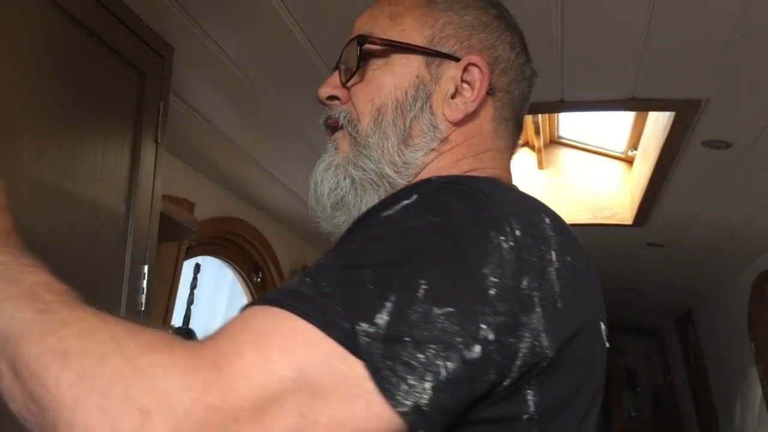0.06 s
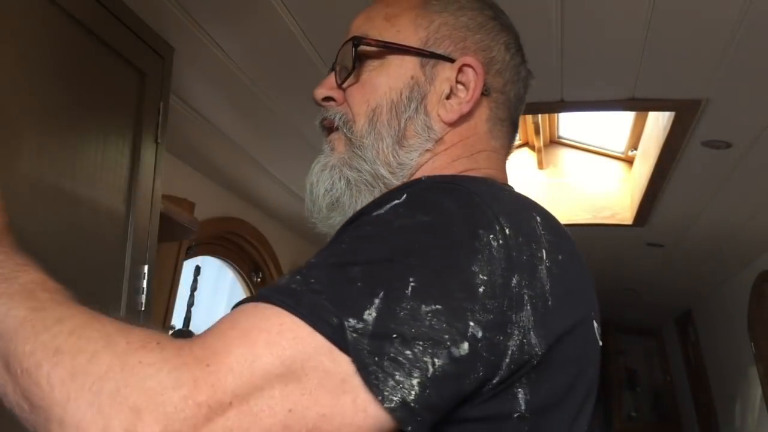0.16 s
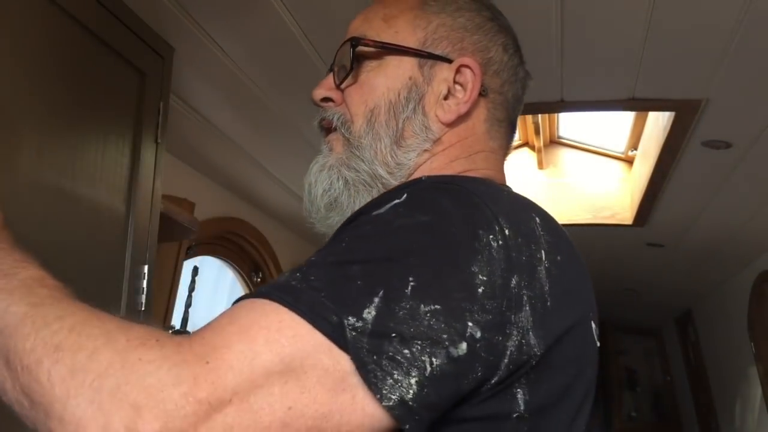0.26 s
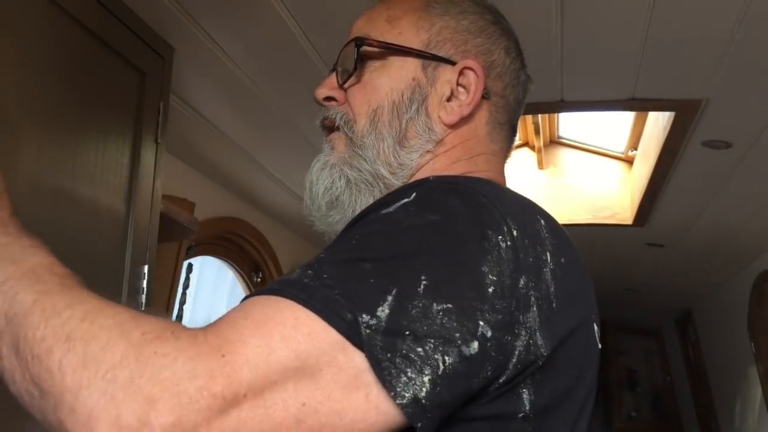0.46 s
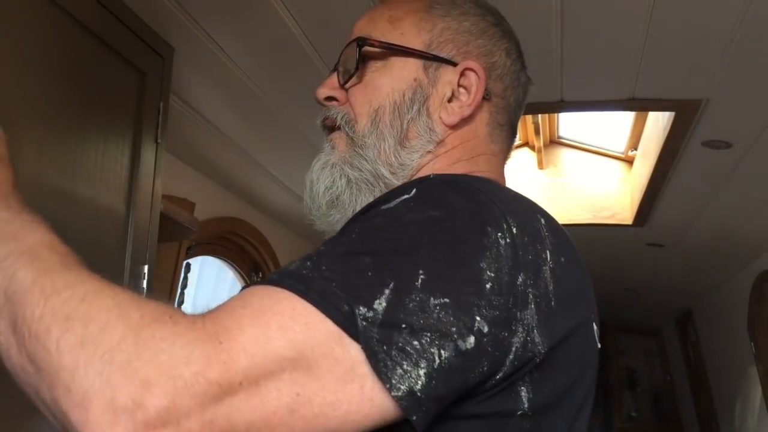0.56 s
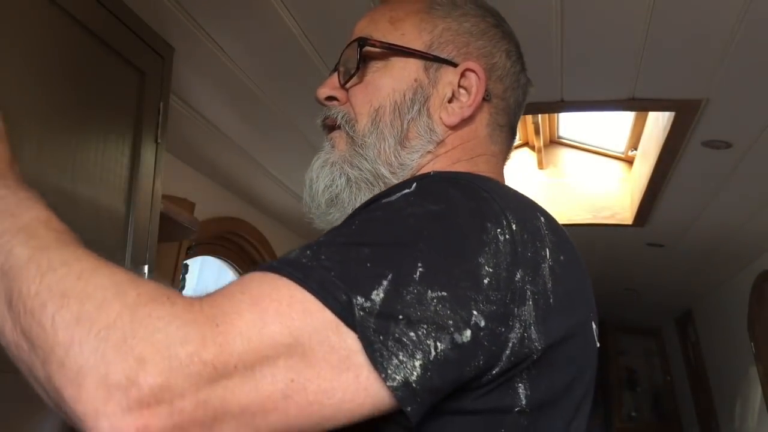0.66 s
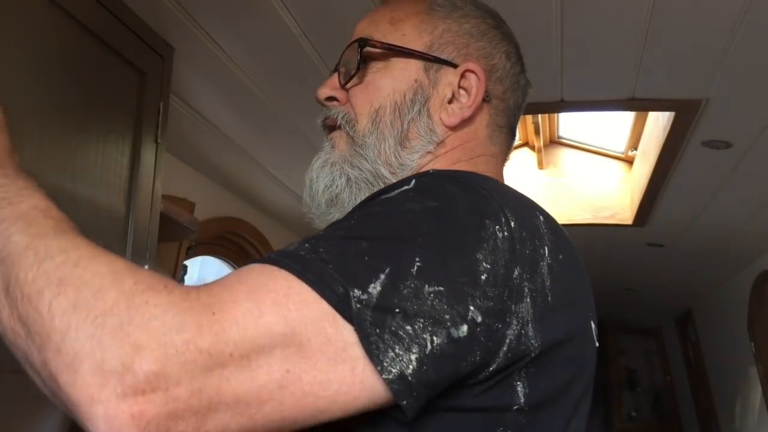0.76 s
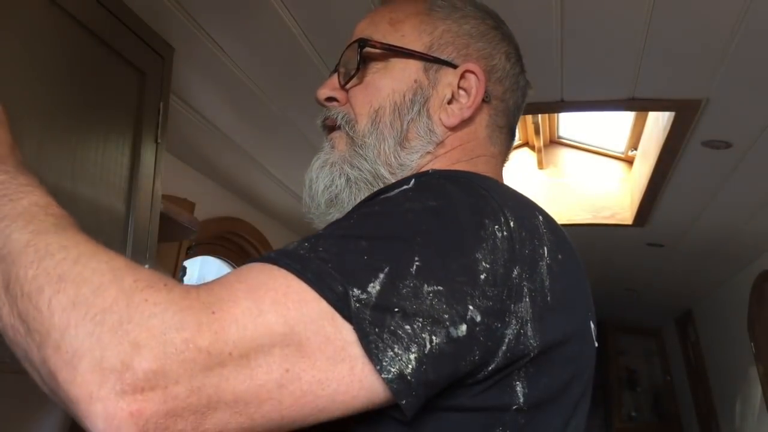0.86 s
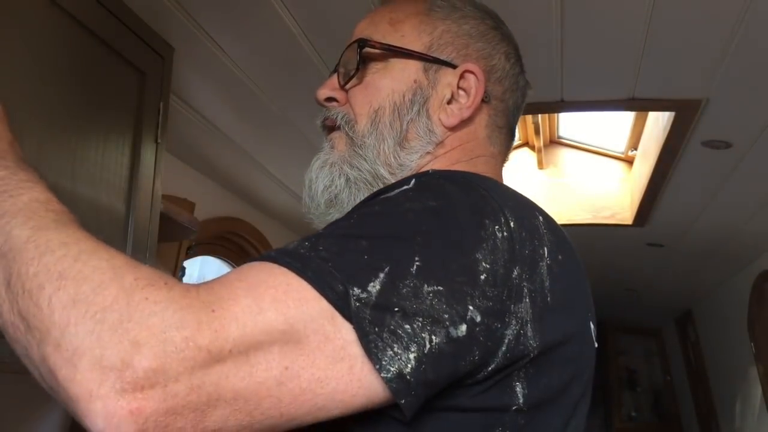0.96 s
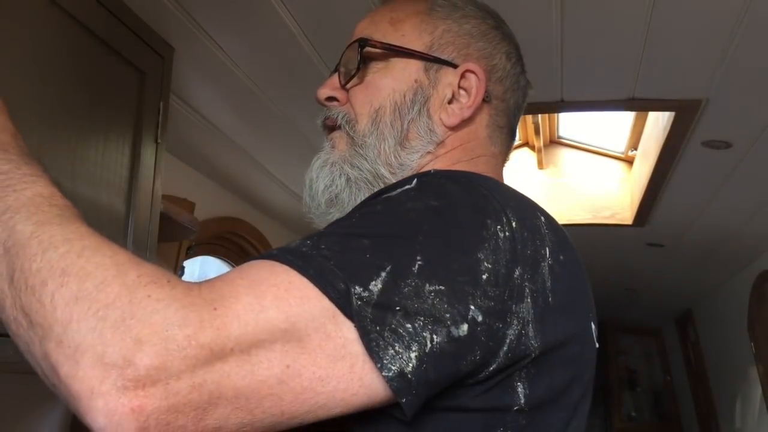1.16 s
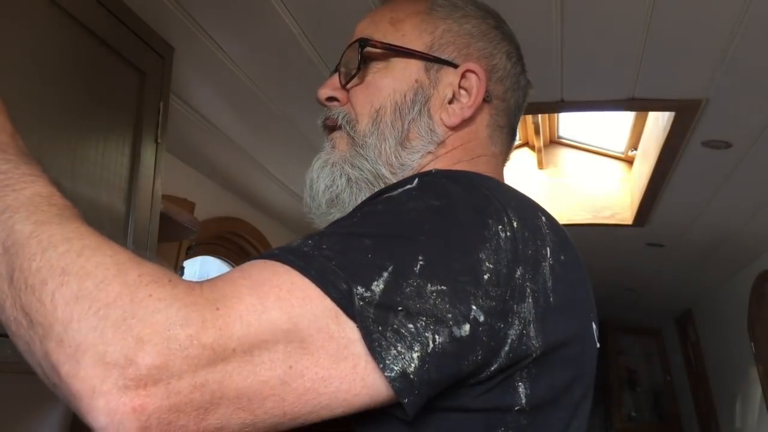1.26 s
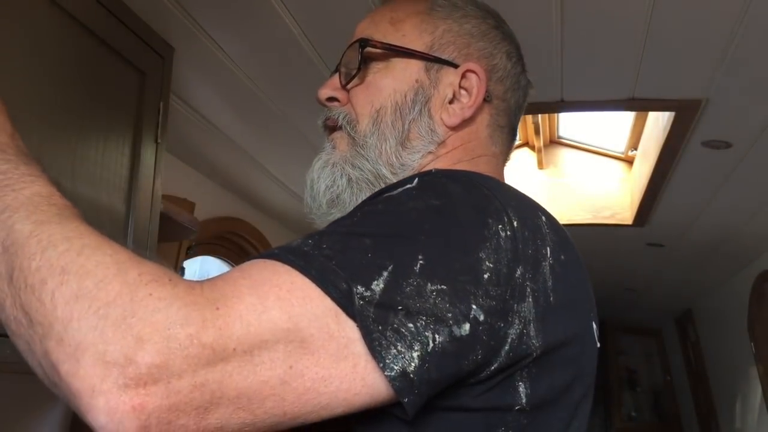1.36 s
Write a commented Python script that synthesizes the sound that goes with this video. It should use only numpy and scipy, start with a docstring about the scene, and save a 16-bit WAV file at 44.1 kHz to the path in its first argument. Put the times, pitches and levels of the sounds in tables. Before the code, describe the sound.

Close by in a small cabin, a wooden cupboard door shuts with a light clack of the catch and a loud, ringing bang. The wood shudders briefly, then a soft thud comes over a faint fan hum.

```python
"""Cupboard door shut in a small cabin

A pushed wooden door knocks on the sprung ball of its catch, which buzzes. It rides over the ball and
slams on the frame: the panel rings under a bright crack and a wood clatter, then shudders and creaks.
Later comes a soft thud on the woodwork. A small fan hums; the microphone softly saturates on the slam."""
import sys
import numpy as np
from scipy import signal
from scipy.fft import rfft, irfft, next_fast_len
from scipy.io import wavfile
from scipy.ndimage import map_coordinates

SR = 44100
rng = np.random.default_rng(int(sys.argv[2]) if len(sys.argv) > 2 else 0)


def wav_out(sig):
    """Save sig, one row per channel (or a flat mono array), as 16-bit PCM at SR to the path in sys.argv[1]."""
    wavfile.write(sys.argv[1], SR, np.round(np.clip(np.atleast_2d(sig).T, -1, 1) * 32767).astype(np.int16))


N = 61739
TIME_S = np.arange(N) / SR
BALL_S, SLAM_S, THUD_S = 0.2003, 0.3337, 1.104

# Modes of the door panel: pitch_hz, ball_level_db, slam_level_db, t60_s
DOOR_MODES = [(86.1, -27.5, -11, .17), (98, -33, -7, 0.037), (135.1, -10, -3.5, 0.15),
              (247, -19.5, -8.5, 0.11), (294.2, -26.5, -26, 0.32), (378.7, -50.5, -30.5, 0.38),
              (445.3, -46.5, -39.5, 0.53), (490.3, -53, -21.5, .15), (551.7, -54, -14.5, 0.2),
              (595.4, -31.5, -34, 0.17), (656.3, -38, -18.5, 0.15), (815, -34.5, -17, 0.11),
              (870, -51.5, -28, 0.27), (1024, -40, -24, 0.16), (1094, -38.5, -16.5, 0.078),
              (1208, -31.5, -21, 0.11), (1322, -41, -26.5, 0.17), (1423, -25, -21.5, 0.055),
              (2124, -63, -29.5, 0.092), (2736, -44.5, -25.5, 0.053)]


def amp(db):
    """Decibels to gain."""
    return 10 ** (np.asarray(db) / 20)


def along(points, hz):
    """A curve through (freq_hz, value) points on a log frequency axis."""
    freqs, values = np.transpose(points)
    return np.interp(np.log(hz + 1), np.log(freqs + 1), values)


def filtered(x, response):
    """A signal shaped by a frequency response."""
    size = next_fast_len(N + SR // 2)
    return irfft(rfft(x, size) * response(np.fft.rfftfreq(size, 1 / SR)), size)[:N]


def noise(response):
    """Coloured noise of rms 1."""
    x = filtered(rng.standard_normal(N), response)
    return x / np.sqrt(np.mean(x ** 2) + 1e-20)


def eq_noise(spectrum):
    """Noise of rms 1 coloured by (freq_hz, relative_db) points."""
    return noise(lambda hz: amp(along(spectrum, hz)))


def band(centre_hz, width_hz):
    """The response of one resonance, its width taken at half amplitude."""
    return lambda hz: 1 / (1 + (2 * (hz - centre_hz) / width_hz) ** 2)


def since(start_s):
    """Seconds after an event, zero before it."""
    return np.maximum(TIME_S - start_s, 0)


def attack(start_s, rise_s):
    """An envelope that eases up from 0 to 1."""
    return 1 - np.exp(-since(start_s) / rise_s)


def fade(start_s, t60_s):
    """A sudden start and an exponential decay."""
    age = since(start_s)
    return (age > 0) * amp(-60 * age / t60_s)


def ring(start_s, modes, rise_cycles=0.66):
    """Struck wood: damped modes, each building up over a fraction of its cycle."""
    return sum(amp(db) * fade(start_s, t60_s) * attack(start_s, rise_cycles / hz) ** 2
               * np.cos(2 * np.pi * hz * since(start_s)) for hz, db, t60_s in modes)


def clatter(start_s, spectrum, level_db):
    """Dense wood clatter spreading through the cabin: noise whose treble dies first."""
    # Decay across the spectrum: freq_hz, t60_s
    decay_times = [(60, 0.32), (250, 0.32), (1000, 0.29), (4000, .24), (9000, 0.2), (16000, .13)]
    hz, frame_s, bands = signal.stft(eq_noise(spectrum), SR, nperseg=256)
    decay = amp(-60 * np.maximum(frame_s - start_s, 0) / along(decay_times, hz)[:, None])
    tail = signal.istft(bands * decay, SR, nperseg=256)[1][:N]
    return amp(level_db) * attack(start_s, rise_s=0.001) * tail


def crack(start_s, spectrum, level_db):
    """The first contact: a short, bright burst of noise."""
    envelope = attack(start_s, rise_s=0.00074) * fade(start_s, t60_s=0.029)
    return amp(level_db) * envelope * eq_noise(spectrum)


def slam():
    """The panel swells as the ball is squeezed, then strikes the frame and rings."""
    # Colour of the heavy wood clatter: freq_hz, relative_db
    clatter_eq = [(40, -17.5), (90, -1), (300, -13.5), (600, -11), (1100, -16), (1700, -23.5), (2700, -28),
                  (4000, -35.5), (7000, -48), (12000, -59.5), (16000, -48)]
    # Colour of the contact with the frame: freq_hz, relative_db
    crack_eq = [(300, -26), (1500, 1), (2800, -0.5), (4000, -10), (6500, -20), (12000, -35.5), (16000, -33)]
    swell_hz, peak_db, swell_db_per_s, release_t60_s = 133, -22.5, 712, 0.021
    to_slam_s = np.maximum(SLAM_S - TIME_S, 0)
    swell_db = peak_db - swell_db_per_s * to_slam_s - 60 * since(SLAM_S) / release_t60_s
    swell = amp(swell_db) * np.cos(2 * np.pi * swell_hz * to_slam_s)
    panel = ring(SLAM_S, [(hz, db, t60_s) for hz, _, db, t60_s in DOOR_MODES])
    return (swell + panel + clatter(SLAM_S, clatter_eq, level_db=-18)
            + crack(SLAM_S, crack_eq, level_db=-19.5))


def ball_catch():
    """The door meets the ball: a damped knock of the panel and a buzz of the spring."""
    # Noise bands of the spring: centre_hz, width_hz, level_db, t60_s
    spring_bands = [(2930, 100, -49, .12), (3880, 640, -55, 0.34), (6270, 1500, -53, 0.24)]
    # Colour of the light wood clatter: freq_hz, relative_db
    clatter_eq = [(60, -44), (140, -14), (300, -11), (700, -22), (1400, -20.5), (1900, -22), (2300, -47),
                  (4000, -57), (7000, -53), (12000, -53), (16000, -74)]
    # Colour of the contact with the ball: freq_hz, relative_db
    crack_eq = [(300, -13), (1400, 4), (2200, -7), (2900, -8), (4500, -15.5), (6500, -16), (12000, -22),
                (16000, -27.5)]
    buzz = sum(amp(db) * fade(BALL_S, t60_s) * noise(band(hz, width_hz))
               for hz, width_hz, db, t60_s in spring_bands)
    panel = ring(BALL_S, [(hz, db, t60_s) for hz, db, _, t60_s in DOOR_MODES])
    damping = fade(BALL_S, t60_s=0.69)
    return (panel * damping + buzz + clatter(BALL_S, clatter_eq, level_db=-32.5)
            + crack(BALL_S, crack_eq, level_db=-31))


def shudder():
    """Cupboard and door settle after the slam with an uneven low rumble."""
    # Envelopes of the cupboard's boom and the door's rumble: time_s, boom_db, panel_db
    envelopes = [(0.48, -61, -45), (0.512, -66, -71), (0.554, -53, -59), (0.59, -52, -71),
                 (0.628, -76, -54.5), (0.672, -48.5, -49), (0.74, -58, -76), (0.802, -63, -84),
                 (0.868, -62.5, -55.5), (0.932, -83, -85), (0.956, -73, -83), (1.0, -93, -93)]
    # Colour of the shuddering panel: freq_hz, relative_db
    panel_eq = [(90, -24), (140, -1.5), (260, -12.5), (500, -36.5), (1500, -85), (16000, -120)]
    times_s, boom_db, panel_db = np.transpose(envelopes)
    boom = amp(np.interp(TIME_S, times_s, boom_db)) * noise(band(centre_hz=81.5, width_hz=26))
    panel = amp(np.interp(TIME_S, times_s, panel_db)) * eq_noise(panel_eq)
    return attack(SLAM_S, rise_s=0.039) * (boom + panel)


def creaks():
    """The settling wood creaks faintly: two ticks of high noise."""
    # Creaks: start_s, level_db
    ticks = [(0.787, -75), (.856, -69.5)]
    envelope = sum(amp(db) * attack(start_s, rise_s=0.0015) * fade(start_s, t60_s=0.055)
                   for start_s, db in ticks)
    return envelope * noise(lambda hz: hz > 4500)


def thud():
    """A soft blow sets the woodwork ringing, low and dull."""
    # Modes of the woodwork: pitch_hz, level_db, t60_s
    wood_modes = [(81, -47, 0.27), (121, -29.5, 0.25), (130.8, -23.5, 0.084), (175, -61, 0.18),
                  (259.4, -35, 0.097), (301.2, -39.5, 0.2), (470, -42, 0.086), (584, -46.5, 0.077),
                  (667, -45.5, 0.055), (884, -50, 0.21), (1140, -53, 0.035), (1420, -53.5, 0.058)]
    # Colour of the muffled clatter: freq_hz, relative_db
    clatter_eq = [(60, -6), (130, 10), (330, -7), (700, -11), (1500, -32), (3000, -63), (16000, -120)]
    return ring(THUD_S, wood_modes) + clatter(THUD_S, clatter_eq, level_db=-42.5)


def fan():
    """A small fan: a steady blade tone and a wavering hum over soft air noise."""
    # Narrow bands of the hum: centre_hz, width_hz, relative_db
    hum_bands = [(295, 46, -4), (586, 37, -6.5), (916.3, 144, -2), (1272, 25, -25.5), (1598, 18, -11.5),
                 (1855, 58, -13.5), (2342, 21, -22), (3000, 160, -36)]
    # Colour of the air noise: freq_hz, relative_db
    air_eq = [(25, -28.5), (60, -4), (150, 0.5), (350, -4), (700, -6.5), (1200, -0.5), (2000, -8.5),
              (3500, -17), (7000, -24), (10000, -29), (14000, -28)]
    blade_hz, blade_db, air_db = 287, -64.5, -67
    hum_db, waver_db, wavers_per_s = -60.5, 1.5, 14
    hum = noise(lambda hz: sum(amp(db) * band(centre, width)(hz) for centre, width, db in hum_bands))
    waver = map_coordinates(rng.standard_normal(40), [TIME_S * wavers_per_s])  # smooth random drift
    blade_tone = amp(blade_db) * np.sin(2 * np.pi * blade_hz * TIME_S)
    return amp(hum_db + waver_db * waver) * hum + blade_tone + amp(air_db) * eq_noise(air_eq)


def scene():
    """The closing door and the later thud over the fan, in mono."""
    return (ball_catch() + slam() + shudder() + creaks() + thud() + fan())[None]


def record(dry):
    """The microphone loses the deepest bass, saturates softly and rolls off to its band limit."""
    low_cut_hz, roll_off_hz, top_hz = 21, 14900, 15800
    ceiling, hardness = 0.5, 5
    low_cut = filtered(dry[0], lambda hz: (1j * hz / (low_cut_hz + 1j * hz)) ** 2)
    saturated = low_cut / (1 + np.abs(low_cut / ceiling) ** hardness) ** (1 / hardness)
    return filtered(saturated, lambda hz: (hz < top_hz) / (1 + (hz / roll_off_hz) ** 20))[None]


dry = scene()
out = record(dry)
wav_out(out)
```